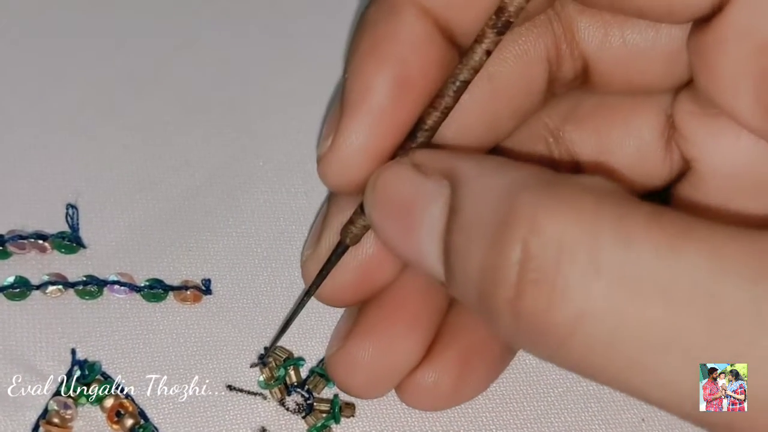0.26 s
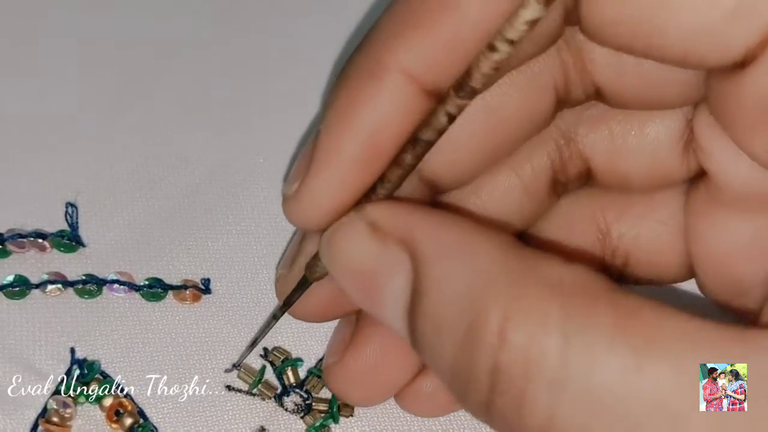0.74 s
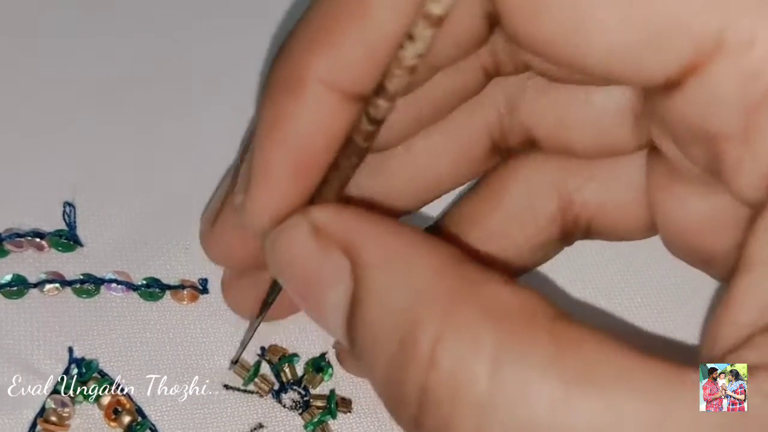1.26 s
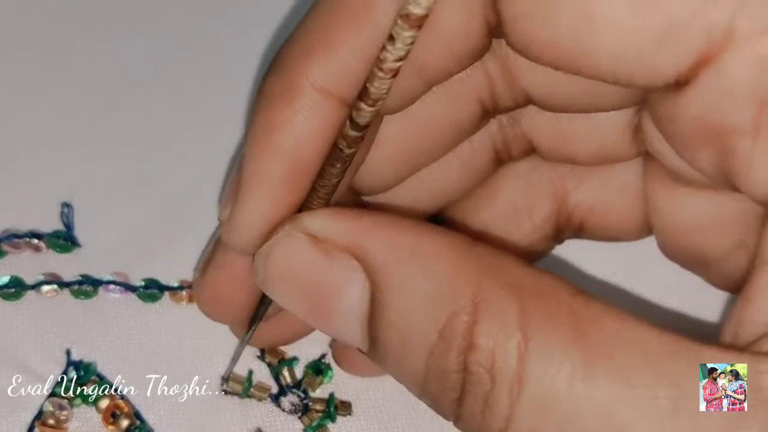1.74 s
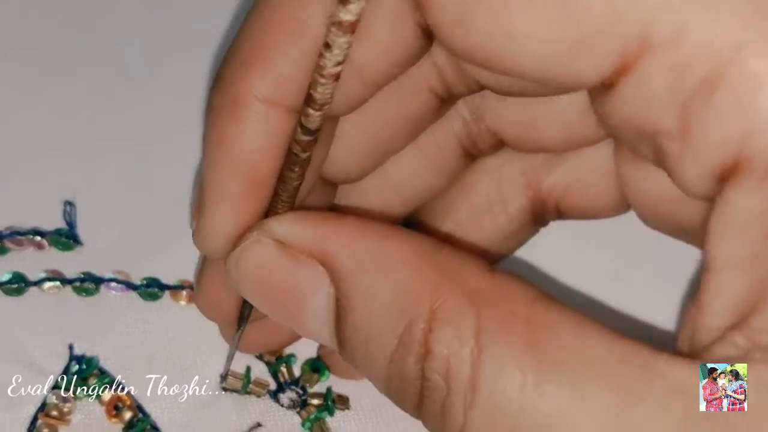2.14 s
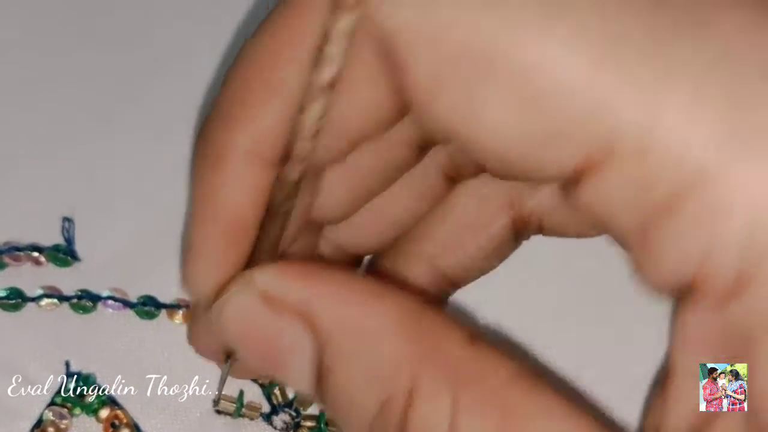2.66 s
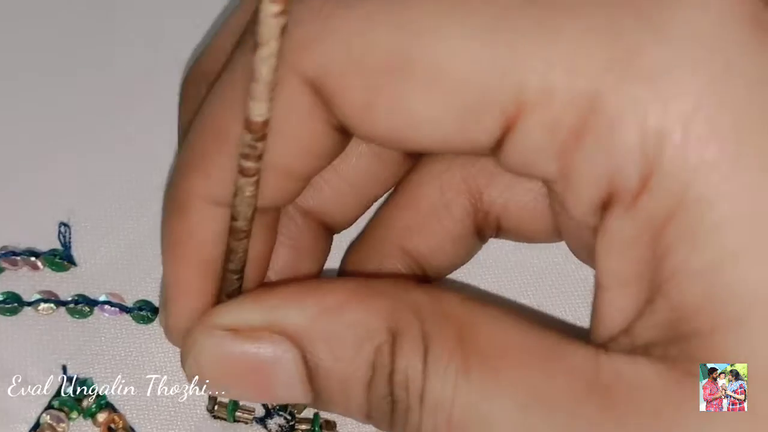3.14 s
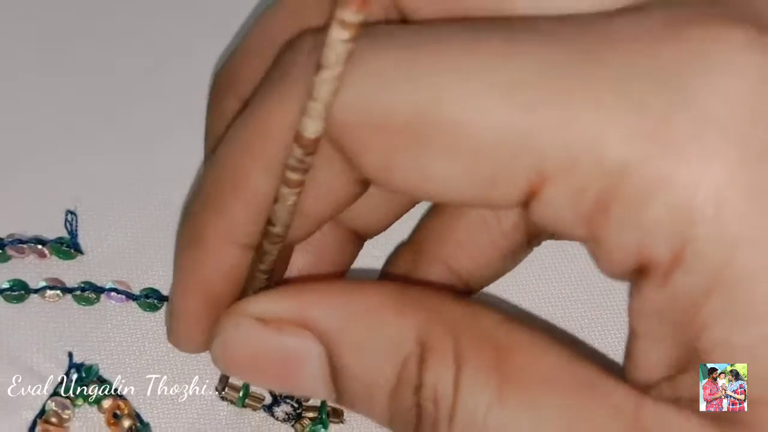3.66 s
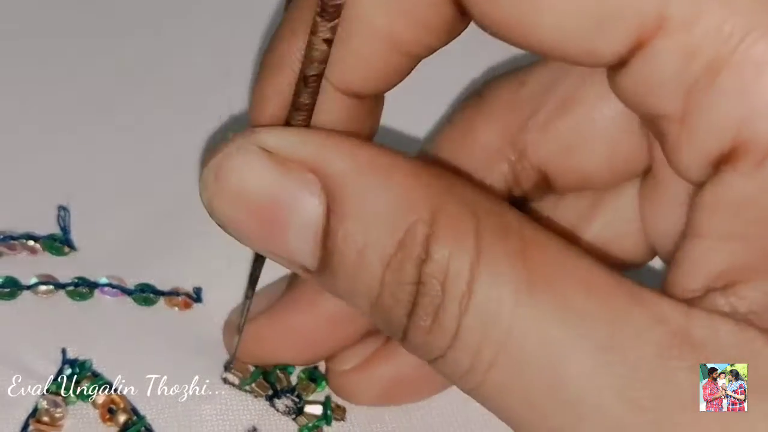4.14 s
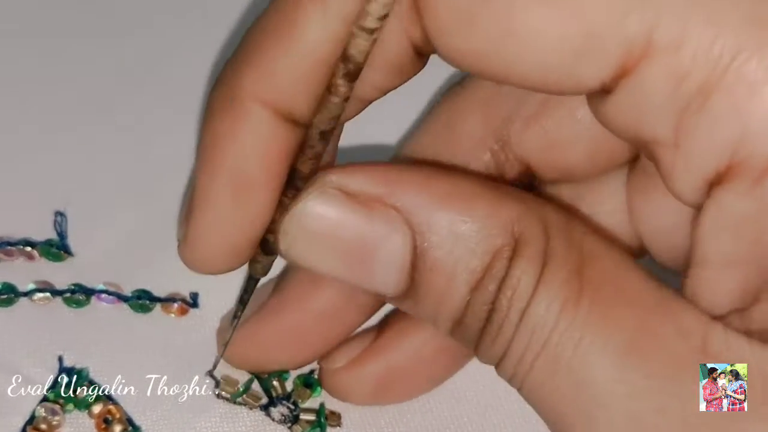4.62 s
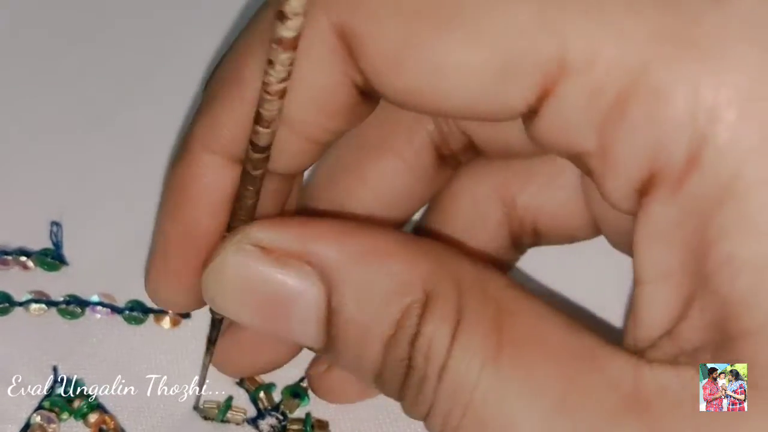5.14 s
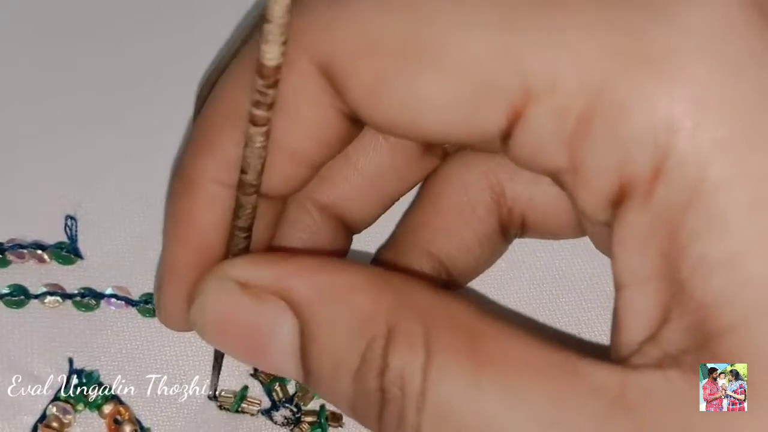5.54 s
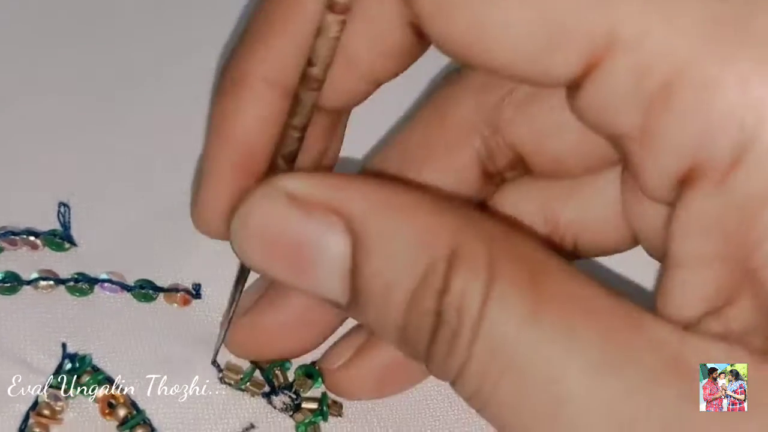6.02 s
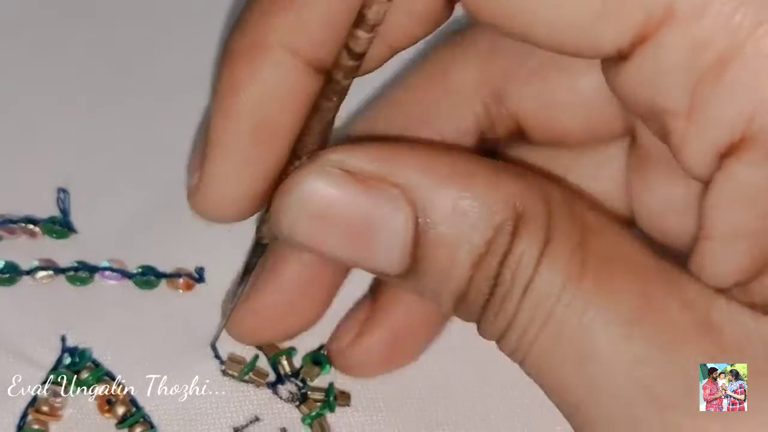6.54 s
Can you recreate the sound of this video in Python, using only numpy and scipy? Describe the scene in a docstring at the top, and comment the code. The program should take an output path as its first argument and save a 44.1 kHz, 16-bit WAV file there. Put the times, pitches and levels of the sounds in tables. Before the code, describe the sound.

Hand embroidery heard very near a stereo phone microphone, leaning right. The needle's passes make uneven little thuds, dry snaps and thin scrapes of thread through tight cloth. Brief low rubbing judders on the right early on. Two pops stand far above the rest, hollow and sharp, the second with a hard steely click; between them are delicate ticks, rasps and near silence, over a faint low room murmur.

```python
"""Cloth pops, cracks and rasps close to a phone in a bare room, as a hook needle works beads onto taut fabric.
Each pass of the hook thumps the stretched cloth into ringing modes, with a snap of fibre and a tick of steel.
Thread rasps through in runs of tiny slips, caught strands burst in gritty noise and two beads clink.
Dull rubbing, juddering low noise, is almost all at the right microphone; shaped noise makes the quiet air.
A limiter ducks overloads."""
import sys
import numpy as np
from scipy import signal
from scipy.fft import rfft, irfft, next_fast_len
from scipy.io import wavfile
from scipy.ndimage import uniform_filter1d, minimum_filter1d

SR = 44100
rng = np.random.default_rng(int(sys.argv[2]) if len(sys.argv) > 2 else 0)


def put_to_file(sound):
    """Save the sound as 16-bit audio at rate SR, in the file named by the first command-line argument."""
    columns = np.atleast_2d(sound).T  # one column per channel
    safe = np.clip(columns, -1, 1)
    whole_steps = np.round(safe * 32767)
    wavfile.write(sys.argv[1], SR, whole_steps.astype(np.int16))


N = 299459
TIME = np.arange(N) / SR

# the hook pops through the cloth: [t/s, force/dB, push length/ms, steel tick against the force/dB,
# depth in favour of the low modes/dB per octave]
POPS = [(1.051, -23.5, 1.25, -27, 0.5), (1.964, -15.5, 1.34, -15.5, 3.5), (2.229, -18.5, 1.38, -28.5, 1.5),
        (2.3094, 11, 0.9, -6, 3), (2.6214, -15.5, 0.77, -16, 0.5), (2.721, -24.5, 4.7, -35, -17),
        (2.866, -28, 3, -37, 0), (2.965, -28, 3.2, -16.5, 7), (3.211, -26.5, 3, -45, 1.5),
        (3.292, -31.5, 1.7, -17, 4), (3.335, -31, 4.2, -37, 7), (3.3627, -11.5, 1.68, -28, -1),
        (3.479, -20.5, 2, -22, 0), (3.648, -14, 1.73, -21, 0), (3.8876, -19, 1.7, -12.5, -0.5),
        (4.764, 13.5, 1.51, -9, 4), (5.373, -31, 3.6, -26.5, 2), (5.475, -28.5, 5.1, -25.5, 2),
        (5.522, -26, 0.87, -16, 4.5), (5.538, -28, 3.9, -30, 8.5), (5.77, -24.5, 4.7, -23.5, 3.5),
        (5.9574, -19, 0.93, 4.5, -1.5), (6.215, -29.5, 4.9, -29.5, 7), (6.333, -38, 6.4, -35, 2),
        (6.409, -21.5, 1.6, -25, -0.5), (6.508, -16, 3.5, -29, 0.5), (6.57, -22, 2.63, -34, -6.5)]
# colour of a fibre snapping off the hook: [f/Hz, relative level/dB]
SNAP_COLOUR = [(50, -55.5), (150, -26.5), (400, -6.5), (700, 1), (1000, 5), (1300, 3.5), (1800, 5.5),
               (2250, -18.5), (3200, -23.5), (6000, -35), (16000, -54)]
# colour of thread grating on the weave: [f/Hz, relative level/dB]
CRUNCH_COLOUR = [(50, -43.5), (150, -22.5), (400, -2), (700, -6), (1000, 0), (1400, 1), (1800, 1),
                 (2300, -9), (3500, -11.5), (6000, -46.5), (16000, -48.5)]
# colour of its fine fibres fraying: [f/Hz, relative level/dB]
FRAY_COLOUR = [(200, -30.5), (1500, 2.5), (2500, 9), (3500, 8.5), (4600, 1), (6500, -5), (9500, 1.5),
               (11000, -16), (13000, -12.5), (16000, -32)]
FRAY_DB = -6.5  # fraying against the coarse snap, before each event's brightness


def undb(db):
    """Decibels to amplitude."""
    return 10 ** (np.asarray(db) / 20)


def unit(x):
    """Scale to rms 1."""
    return x / np.sqrt(np.mean(x ** 2))


def along(points, hz, axis=1):
    """Read a column of a table on a log-frequency axis."""
    rows = np.array(points, float)
    return np.interp(np.log(np.maximum(hz, 1)), np.log(rows[:, 0]), rows[:, axis])


def add(track, s, x):
    """Mix x into the track from time s."""
    i = max(int(s * SR), 0)
    track[i:i + len(x)] += x[:len(track) - i]


def ring(x, response):
    """Pass x through an impulse response."""
    return signal.fftconvolve(x, response)[:N]


def click(points, size=1024):
    """A minimum-phase click of a given colour, peak 1: its energy comes as early as that colour allows."""
    cepstrum = irfft(np.log(undb(along(points, np.fft.rfftfreq(size, 1 / SR)))))
    # fold the cepstrum onto positive time
    cepstrum[1:size // 2] *= 2
    cepstrum[size // 2 + 1:] = 0
    x = irfft(np.exp(rfft(cepstrum)))
    return x / np.abs(x).max()


def push(ms):
    """A smooth push of unit area: the longer, the duller."""
    width = max(ms * SR / 1000, 4)  # samples
    x = np.sin(np.pi * np.arange(int(width) + 1) / width) ** 2
    return x / x.sum()


def waver(per_s):
    """A level that wanders by chance, spread near 1."""
    knots = np.arange(0, TIME[-1] + 1, 1 / per_s)
    return np.interp(TIME, knots, rng.standard_normal(512)[:len(knots)])


def diffuse(size):
    """Spectra of stereo noise, most alike in the low mids and unrelated above, and their frequencies."""
    # share of the sound that both microphones have in common: [f/Hz, share/0-1]
    likeness = [(60, 0.3), (400, 1), (700, 0), (1300, 0), (16000, 0)]
    hz = np.fft.rfftfreq(size, 1 / SR)
    alike = np.clip(along(likeness, hz), -1, 1)
    mid, side = rfft(rng.standard_normal((2, size)))
    mid = mid * np.sqrt((1 + alike) / 2)
    side = side * np.sqrt((1 - alike) / 2)
    return np.array([mid + side, mid - side]), hz


def air(swell_db=0.5, flicker_db=2.0, count=10):
    """The quiet murmur of the room: shaped noise that swells as a whole while each band flickers on its own."""
    # colour of the murmur: [f/Hz, relative level/dB per Hz]
    air_colour = [(15, -86), (25, -45.5), (46, -11), (80, -19), (133, -3.5), (173, -10), (237, -12),
                  (293, -14), (485, -10.5), (741, -19.5), (1050, -22.5), (2380, -28), (3730, -38),
                  (12600, -51), (14000, -56)]
    # level of the murmur before its random swell: [t/s, level/dB]
    air_level = [(0, -59.5), (.5, -59), (1.35, -61.5), (1.8, -57), (3, -58), (4.2, -64.5), (4.7, -63.5),
                 (5.5, -60), (6.79, -71.5)]
    size = next_fast_len(N)
    noise, hz = diffuse(size)
    noise = noise * undb(along(air_colour, hz))
    centres = np.geomspace(40, 12000, count)
    murmur = 0
    for own in np.eye(count):
        band = irfft(noise * along(np.c_[centres, own], hz), size)[:, :N]
        murmur = murmur + band * undb(flicker_db * waver(per_s=18))
    level_db = np.interp(TIME, *np.transpose(air_level)) + swell_db * waver(per_s=12)
    return unit(murmur) * undb(level_db)


def room(x, build_s=0.0027, count=16):
    """A diffuse tail that builds within milliseconds; each band of noise dies at its own rate."""
    # the reverberation: [f/Hz, relative level/dB, t60/s]
    reverb = [(78, -4.5, 0.48), (196, 6, 0.34), (390, 1, 0.46), (725, -2.5, 0.36), (1610, -11, 0.44),
              (2480, -3.5, 0.44), (4620, -4.5, 0.54), (9070, -6.5, 0.35), (14830, -13, 1)]
    noise, hz = diffuse(SR)
    t = TIME[:SR]
    centres = np.geomspace(60, 15000, count)
    tail = 0
    for f, own in zip(centres, np.eye(count)):
        band = irfft(noise * along(np.c_[centres, own], hz), SR)
        fade = undb(-60 * t / along(reverb, f, axis=2)) * (1 - np.exp(-t / build_s))
        tail = tail + undb(along(reverb, f)) * band * fade / np.linalg.norm(fade)
    return np.array([ring(x, side) for side in tail])


def near_echoes(x, reach_ms=2.6, echo_db=-12, above_hz=1500, count=8):
    """Hand, frame and phone throw the treble back within milliseconds and comb its colour."""
    taps = np.zeros(SR // 50)
    at = np.minimum(rng.uniform(0.076, 1, count) * reach_ms * SR / 1000, len(taps) - 1).astype(int)
    taps[at] = undb(echo_db) * rng.choice([-1, 1], count)
    treble_only = signal.butter(2, above_hz, "high", fs=SR, output="sos")
    return x + ring(x, signal.sosfilt(treble_only, taps))


def ports(x, left_db):
    """The work lies nearer the right microphone: the left hears it later and weaker."""
    lag = 8  # samples
    return np.array([undb(left_db) * np.pad(x, (lag, 0))[:N], x])


def port_ring(x):
    """Sharp sounds that enter the left port ring the small cavity behind it, a resonant peak."""
    cavity_hz, cavity_q, cavity_db = 4600, 1.6, -5.5  # level against the sound that enters
    cavity = signal.lfilter(*signal.iirpeak(cavity_hz, cavity_q, fs=SR), x[0])
    return np.array([x[0] + undb(cavity_db) * cavity, x[1]])


def slips(length, per_s, jitter, scatter_db, count=512):
    """Stick-slip: an uneven train of pulses, to either side, that swells and dies away."""
    gap, size, side = rng.standard_normal((3, count))
    at = np.cumsum(np.exp(jitter * gap)) / per_s
    keep = at < length
    swell = np.abs(np.sin(np.pi * at / length)) ** .5
    pulses = np.sign(side) * undb(scatter_db * size) * swell
    x = np.zeros(int(length * SR) + 1)
    x[(at[keep] * SR).astype(int)] = pulses[keep]
    return x


def cloth(scatter_db, depth_db=0):
    """Ringing drumhead modes: every spot weights them anew, the slack middle favours the low ones."""
    # the stretched cloth's modes: [f/Hz, relative level/dB, t60/s]
    modes = [(103.5, -10, 0.1), (115.3, -5, 0.11), (157, -14.5, 0.11), (206.5, -6, 0.081),
             (242, -5.5, 0.06), (264, 3, 0.054), (311.8, 0, 0.11), (382.6, -1, 0.11), (414, -8, 0.029),
             (475, -6.5, 0.12), (605.5, -3.5, 0.15), (658.8, -4, 0.17), (790, -5.5, 0.019), (975, -1, 0.13)]
    ready_db, mid_mode_hz = 2.5, 326  # how readily it rings; the pitch that rings alike at every spot
    # the hand presses as it rings: spread of tuning between strokes, and of a bend that settles within one
    detune, bend_depth, bend_s = 0.022, 0.062, 0.045
    t = TIME[:SR // 7]
    spot, lobe, tension, bend = rng.standard_normal((4, len(modes)))
    settling = bend_depth * bend_s * (1 - np.exp(-t / bend_s))
    weight_db = scatter_db * spot + depth_db * np.log2(mid_mode_hz / np.array(modes)[:, 0])
    x = np.zeros(len(t))
    for (hz, db, t60), w, sign, d, b in zip(modes, weight_db, np.sign(lobe), tension, bend):
        cycles = hz * ((1 + detune * d) * t + b * settling)
        x += sign * undb(db + w) * np.cos(2 * np.pi * cycles) * undb(-60 * t / t60)
    return undb(ready_db) * x / sum(undb(db) for _, db, _ in modes)


def rubbing(grit_per_s=600, jitter=.93):
    """Two strokes of low, juddering noise with a little stick-slip grit, carried by touch without any room."""
    # pressure of each stroke, one list per stroke: [t/s, relative level/dB]
    strokes = [
        [(0.635, -79), (0.668, -41), (0.722, -34.5), (0.76, -58), (0.78, -29), (0.82, -40.5), (1.0, -86)],
        [(2.115, -51), (2.132, -26), (2.152, -19.5), (2.192, -34), (2.212, -24), (2.282, -30), (2.3, -57)],
    ]
    # resonances of the rumble: [f/Hz, width/Hz, relative level/dB]
    body_peaks = [(125.7, 37, -1.5), (180, 49, -6.5), (214, 210, -19)]
    rumble_db, grit_db = 2.5, -53.5  # gain of the rumble; middle level of one grain, before its colour
    hz = np.fft.rfftfreq(N, 1 / SR)
    body = sum(undb(db) / (1 + ((hz - f) / width) ** 2) ** 2 for f, width, db in body_peaks)
    judder = irfft(rfft(rng.standard_normal(N)) * body, N)
    judder = judder / np.sqrt(uniform_filter1d(judder ** 2, SR // 25))  # the pressure alone sets the level
    pressure, grit = np.zeros((2, N))
    for curve in strokes:
        s, db = np.transpose(curve)
        pressure += np.interp(TIME, s, undb(db), left=0, right=0)
        add(grit, s[0], undb(grit_db) * slips(s[-1] - s[0], grit_per_s, jitter, scatter_db=-6.0))
    return undb(rumble_db) * pressure * judder + ring(grit, click(SNAP_COLOUR))


def touches():
    """Fingers keep nudging the cloth very softly: an uneven train of small pushes sets its modes ringing."""
    train = undb(-53.5) * slips(TIME[-1], per_s=23, jitter=0.42, scatter_db=1.5)
    return ring(ring(train, push(ms=0.76)), cloth(scatter_db=2.0))


def beads():
    """The steel tip clinks on a glass bead held by the thread: a sine that dies within milliseconds."""
    # the clinks: [t/s, f/Hz, starting level/dB, t60/s]
    clinks = [(2.6206, 4240, -13.5, 0.0026), (4.764, 5710, 3, 0.0017)]
    out, t = np.zeros(N), TIME[:SR // 20]
    for s, hz, db, t60 in clinks:
        add(out, s, undb(db - 60 * t / t60) * np.sin(2 * np.pi * hz * t))
    return out


def catches():
    """A strand caught on the hook gives way at once: a fading burst of coarse and fine noise."""
    # the caught strands: [t/s, fading time/ms, level/dB, brightness/dB]
    caught = [(0.69, 5, -28.5, -18), (0.707, 3.8, -25.5, -28), (0.8098, 1.2, -28, 2), (0.824, 4.8, -25, -3),
              (1.964, 6.9, -28, 6), (2.566, 3.5, -14.5, -14.5), (2.578, 3, -12, -15),
              (2.622, 2.4, -13.5, -6), (2.868, 7.2, -38.5, -13), (2.968, 5.9, -32, -16),
              (3.329, 4.4, -26, -10), (3.3623, 4, -20.5, -12), (5.316, 8.7, -36, -0.5),
              (5.477, 2.1, -44, -7), (5.771, 4.4, -38, -6), (5.957, 1.2, -27.5, 15), (6.404, 2.3, -27, 2.5),
              (6.508, 1.7, -33, -3), (6.5449, 1.1, -30, 8), (6.5567, 5.5, -24, 5.5),
              (6.567, 2.2, -22.5, -5)]
    out, t = np.zeros(N), TIME[:SR // 30]
    crunch, fray = click(CRUNCH_COLOUR), click(FRAY_COLOUR)
    for s, ms, db, bright_db in caught:
        fade = np.exp(-1000 * t / ms)
        coarse, fine = undb(db) * rng.standard_normal((2, len(t))) * fade / np.linalg.norm(fade)
        fraying = undb(FRAY_DB + bright_db) * np.convolve(fine, fray)
        add(out, s, np.convolve(coarse, crunch) + fraying)
    return out


def grip(train, swell_db, count=64):
    """Friction swells or fades along a pull, in lumps as the thread binds and runs free."""
    grip_db, grip_per_s = 3, 82  # spread of the friction, and how often it changes
    t = TIME[:len(train)]
    lumps = np.interp(t * grip_per_s, np.arange(count), rng.standard_normal(count))
    return train * undb(swell_db * np.linspace(-.5, .5, len(t)) + grip_db * lumps)


def drags():
    """The shaft drags through the hole after every pop: short, fading rasps as rows like those of the pulls."""
    length_s, against_force_db, limit_db, swell_db = 0.081, -31, -48, -7  # friction gives no more than the limit
    rows = []
    for s, force_db, *_ in POPS:
        rows.append((s, length_s, min(force_db + against_force_db, limit_db), 0, swell_db))
    return rows


def thread():
    """Thread slips from strand to strand, tugging the cloth; fine fibres fray each slip into a short fizz."""
    # thread pulled through the weave; the long fading rows after loud pops thicken their room tail:
    # [t/s, length/s, one slip's level/dB, brightness/dB, swell from start to end/dB]
    pulls = [(0.683, 0.04, -41, -6, -7), (0.646, 0.26, -49.5, 0, -3), (0.826, 0.023, -42, 4.5, -10),
             (0.838, 0.17, -54.5, -3, -8.5), (1.052, 0.011, -44, -5.5, -3), (1.6, 0.24, -62, 11, -10),
             (1.927, 0.023, -55.5, -6, 5), (1.966, 0.051, -48.5, 6, -3), (2.117, 0.13, -58, 7, -3),
             (2.254, 0.028, -55, 4, 11), (2.303, 0.003, -32, -10, 0), (2.32, 0.082, -36, -19, -11),
             (2.505, 0.066, -37.5, -3.5, 9.5), (2.561, 0.025, -28, 0.5, -11), (2.628, .1, -50.5, -3, 1),
             (2.963, 0.11, -51, 2, -10.5), (3.205, 0.045, -46.5, 1, -5.5), (3.282, 0.02, -50, -0.5, -3),
             (3.32, 0.024, -37.5, 1.5, -4), (3.363, 0.056, -42, -4.5, -6), (3.46, 0.05, -43, -3, 2),
             (3.526, 0.048, -51, 0.5, -2), (4.749, 0.013, -43.5, -3, 9), (4.768, 0.45, -52, 1, -13),
             (4.772, .1, -39, -10.5, -2.5), (5.174, 0.03, -53, 4.5, -1), (5.522, 0.023, -39.5, -1.5, -3),
             (5.959, 0.16, -43.5, 2, -21), (6.401, 0.0073, -31.5, 5.5, 6), (6.556, 0.018, -39.5, -0.5, -2)]
    tug_db = 3.5  # tug on the cloth against the snap; brightness trades it for fraying
    tugs, snaps, ticks = np.zeros((3, N))
    fray = np.exp(-TIME[:SR // 100] / 0.0008)
    for s, length, db, bright_db, swell_db in drags() + pulls:
        train = undb(db) * grip(slips(length, per_s=850, jitter=.55, scatter_db=3.5), swell_db)
        add(tugs, s, undb(tug_db - bright_db) * signal.fftconvolve(train, cloth(scatter_db=3.0)))
        add(snaps, s, train)
        add(ticks, s, undb(FRAY_DB + bright_db) * train)
    fizz = ring(ticks, fray / np.linalg.norm(fray)) * rng.standard_normal(N)
    rasps = ring(snaps, click(CRUNCH_COLOUR)) + ring(.5 * ticks + 1.033 * fizz, click(FRAY_COLOUR))
    return ring(tugs, push(ms=1.63)), rasps


def tear(spread_ms, fibre_db, count=30):
    """One strand lets go and many fine fibres follow within milliseconds."""
    x = np.zeros(SR // 40)
    x[0] = 1
    delays = rng.exponential(spread_ms * SR / 1000, count) + SR // 4000
    at = np.minimum(delays, len(x) - 1).astype(int)
    x[at] += undb(fibre_db) * rng.standard_normal(count)
    return x


def hook():
    """Each pop releases the cloth with a thump, a snap and a tick; hard or quick pops snap louder."""
    # colour of the steel tip's tick: [f/Hz, relative level/dB]
    tick_colour = [(200, -22.5), (1500, 12), (2500, 8.5), (3200, 6.5), (4300, 4.5), (5500, -0.5),
                   (7000, -3.5), (9300, -1), (11000, -15), (13000, -12), (16000, -31)]
    usual_push_ms, snap_db_per_halving = 1.5, 3  # a quicker push snaps louder
    usual_snap_db = -4.5  # snap against the force at the usual push length
    tearing_db, snap_growth = -3.5, 0.59  # harder pops tear fibre: extra dB of snap per dB of force
    blunt_below_db, blunt_ms_per_db = -11.5, 0.14  # the less the steel ticks, the blunter and duller the snap
    thumps, snaps, ticks = np.zeros((3, N))
    snap, tick = click(SNAP_COLOUR), click(tick_colour)
    for s, force_db, ms, steel_db, depth_db in POPS:
        quickness = np.log2(usual_push_ms / ms)
        snap_db = force_db + usual_snap_db + snap_db_per_halving * quickness
        snap_db += snap_growth * max(force_db - tearing_db, 0)
        thump = signal.fftconvolve(cloth(scatter_db=0.45, depth_db=depth_db), push(ms))
        add(thumps, s, undb(force_db) * thump)
        fibres = tear(spread_ms=2, fibre_db=-27)
        contact = push(blunt_ms_per_db * max(blunt_below_db - steel_db, 0))
        add(snaps, s, undb(snap_db) * np.convolve(np.convolve(snap, contact), fibres))
        # the minus lets tick and snap add up where their bands meet
        add(ticks, s, -undb(force_db + steel_db) * np.convolve(tick, fibres))
    return thumps, snaps, ticks


def scene():
    """Cloth, fibre and bead sounds, direct and through the room, over rubbing and still air."""
    thumps, snaps, ticks = hook()
    tugs, rasps = thread()
    low, clinks, cracks = thumps + tugs + touches(), beads(), catches()
    sharp = ports(snaps + ticks, left_db=-5)
    sharp = sharp + ports(rasps + cracks, left_db=-4.5) + ports(clinks, left_db=-2)
    echoed = np.array([near_echoes(side) for side in port_ring(sharp)])
    direct = undb(5.0) * ports(low, left_db=-4) + echoed
    # the cracks are aimed at the phone, so less of them reaches the walls
    outward = low + undb(-7.5) * (snaps + clinks) + ticks + undb(6.0) * rasps + undb(-5.5) * cracks
    return direct + undb(-4.0) * room(outward) + ports(rubbing(), left_db=-31) + air()


def limiter(x, ceiling_db, release_db_per_s=85, size=129):
    """The gain drops just ahead of an overload and climbs back steadily."""
    over = np.maximum(20 * np.log10(np.abs(x).max(axis=0) + 1e-9) - ceiling_db, 0)
    release = release_db_per_s * TIME
    held = np.maximum.accumulate(over + release) - release
    return x * undb(uniform_filter1d(minimum_filter1d(-held, size), size))


def record(dry):
    """The phone trims the deep bass, limits and clips the peaks and cuts the top."""
    x = signal.sosfilt(signal.butter(2, 55, "high", fs=SR, output="sos"), dry)
    x = np.clip(limiter(x, ceiling_db=-1.0), -1, 1)
    top_hz = 13800
    return signal.sosfilt(signal.ellip(8, .2, 70, top_hz, fs=SR, output="sos"), x)


dry = scene()
out = record(dry)
put_to_file(out)
```